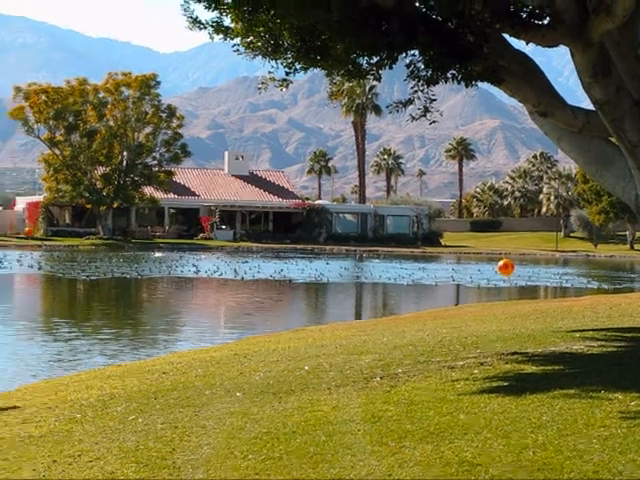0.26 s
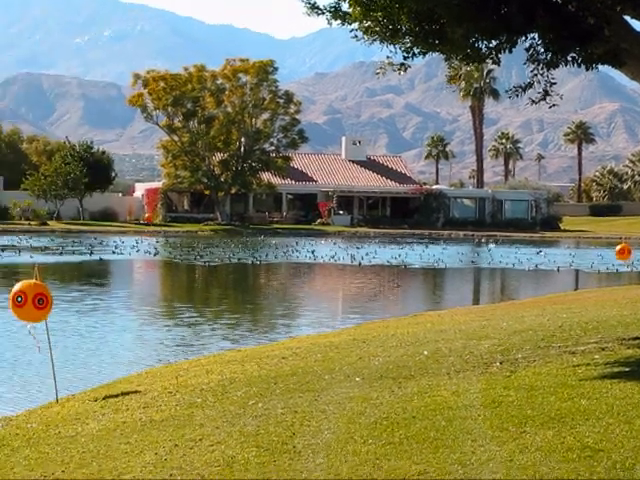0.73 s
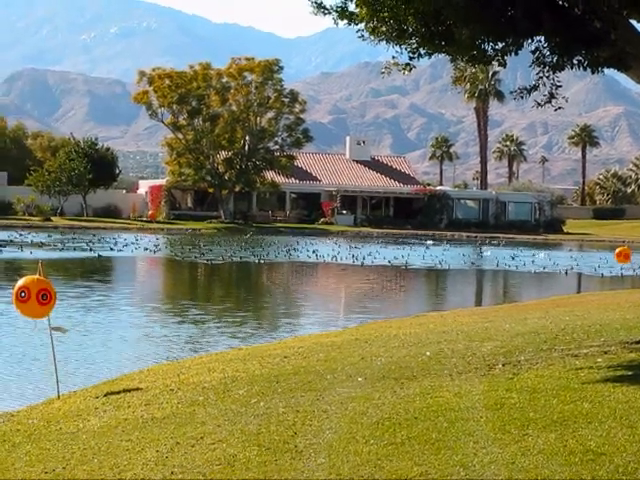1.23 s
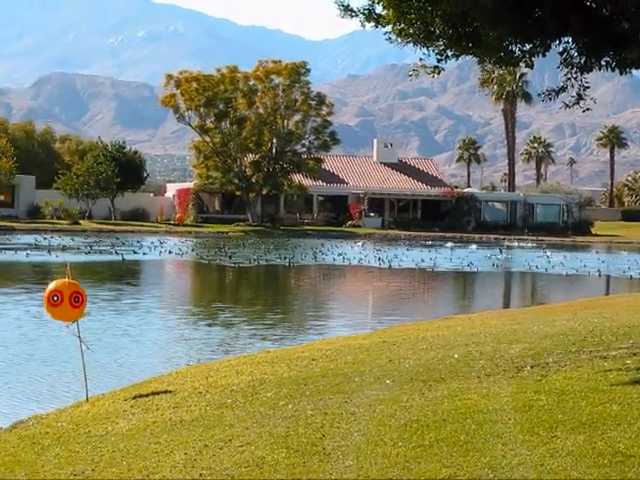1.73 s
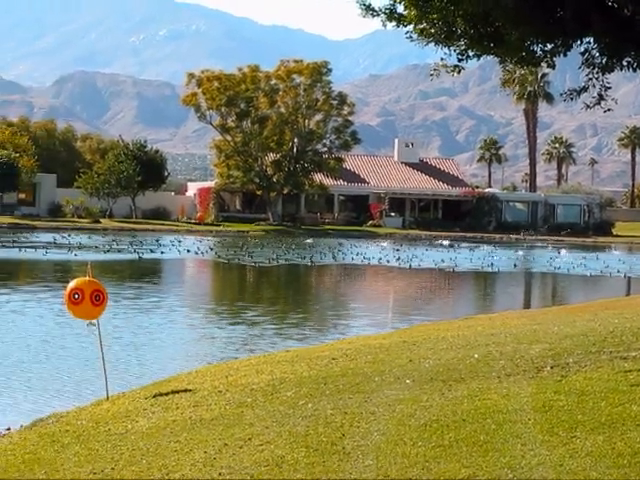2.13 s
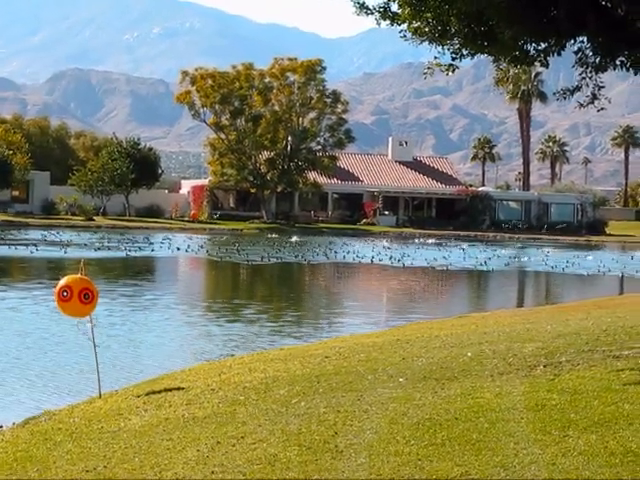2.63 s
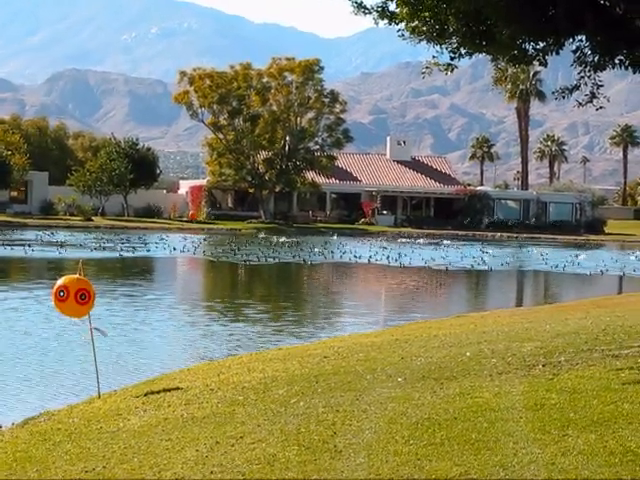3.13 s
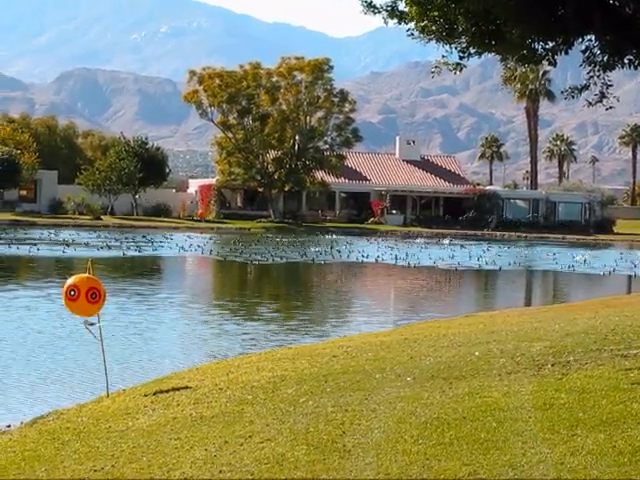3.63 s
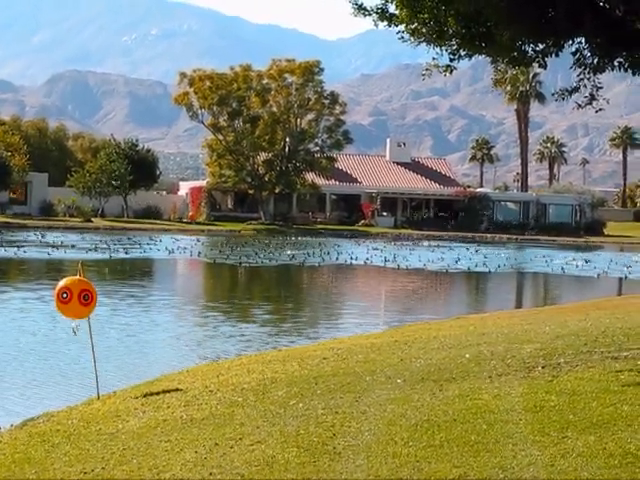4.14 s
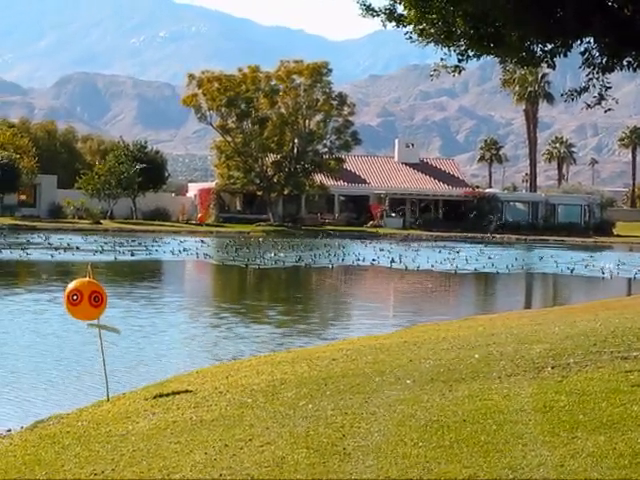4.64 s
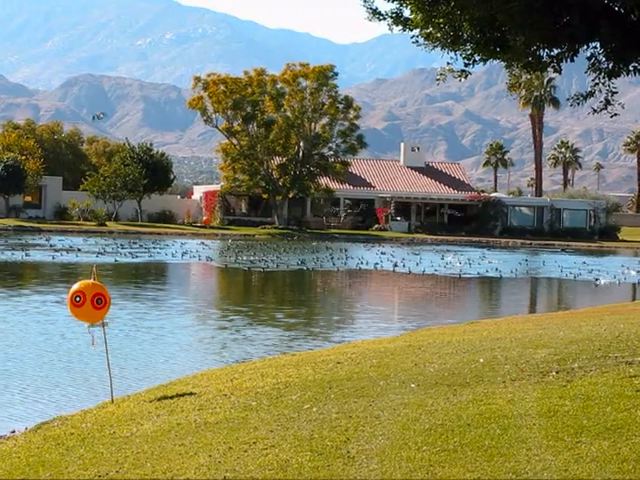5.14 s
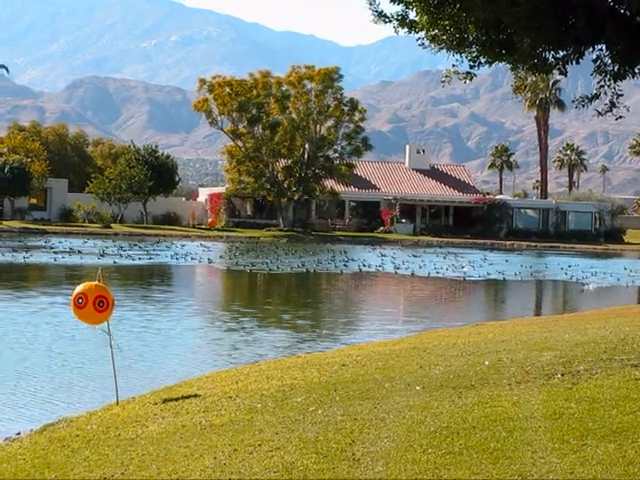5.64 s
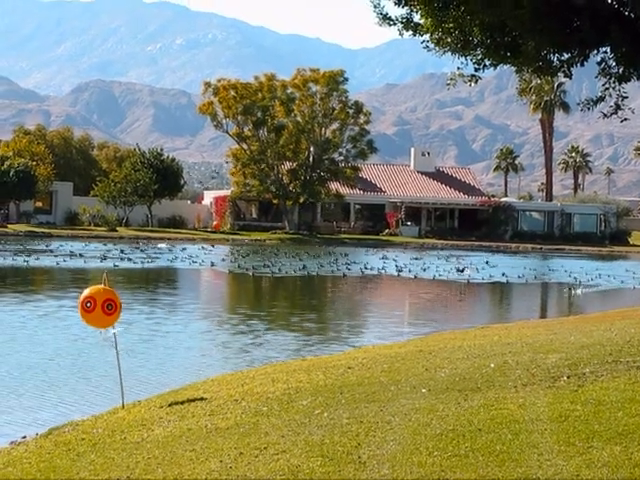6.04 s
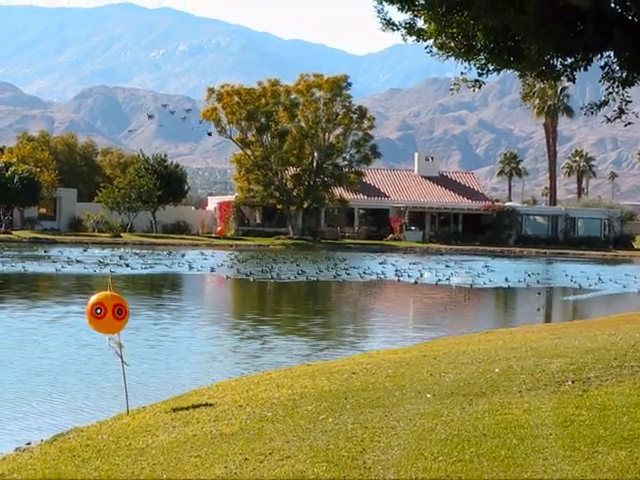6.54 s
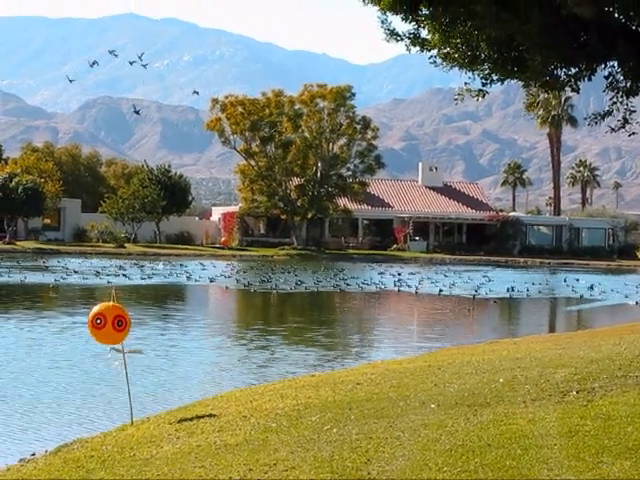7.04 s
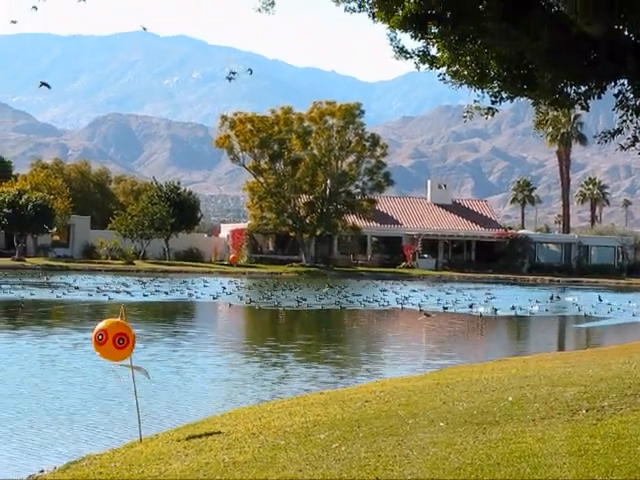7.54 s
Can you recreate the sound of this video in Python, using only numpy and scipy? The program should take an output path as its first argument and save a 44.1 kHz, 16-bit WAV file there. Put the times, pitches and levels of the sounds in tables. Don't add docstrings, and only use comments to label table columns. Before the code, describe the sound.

Far bird chatter and small splashes swell into crowded short whistles and dry clucks, while gusts bump the microphone and wings whistle past.

```python
import sys
import numpy as np
from scipy import signal
from scipy.fft import rfft, irfft
from scipy.io import wavfile
from scipy.ndimage import uniform_filter1d, map_coordinates

SR = 44100
rng = np.random.default_rng(int(sys.argv[2]) if len(sys.argv) > 2 else 0)


def ratio_of_db(decibels):
    return 10 ** (np.asarray(decibels, float) / 20)


def to_wav(sig):
    pcm = np.clip(np.atleast_2d(sig), -1, 1) * 32767
    pcm = np.round(pcm).astype(np.int16)
    wavfile.write(sys.argv[1], SR, pcm.T)


N = 343098

# [t/s, traffic level/dB, flock murmur level/dB, air hiss level/dB]
BACKGROUND = [
    (0.0, -51.5, -59, -57),
    (2.99, -48.5, -46, -56.5),
    (4.81, -50, -45.5, -55.5),
    (6.26, -49.5, -52, -55.5),
    (7.78, -49.5, -51, -53.5),
]
# [f/Hz, density level/dB]
TRAFFIC_SPECTRUM = [(18, -50), (30, -17), (59, -17.5), (118, -1), (206, -6.5), (412, -9), (717, -5.5),
                    (1760, -10.5), (2120, -13.5), (4000, -23), (5200, -26), (8800, -120)]
# [f/Hz, density level/dB]
HISS_SPECTRUM = [(880, -53), (1500, -8), (1830, -12.5), (2180, -3.5), (2360, -7.5), (3710, -8.5),
                 (9250, -16), (15700, -23.5)]
# [f/Hz, density level/dB]
MURMUR_SPECTRUM = [(1300, -6), (1800, -4), (2100, -9), (2600, 1), (3200, -6.5), (3900, -13)]
# [f/Hz, level/dB]
ELECTRONIC_TONES = [
    (15735, -85),
    (8970, -80),
    (9270, -80),
]
# [t/s, level/dB]
MACHINE_CARRIED = [(0, -62), (.45, -58), (.7, -52), (1.2, -49), (2.1, -46), (2.85, -56), (3.3, -60),
                   (4.4, -51), (5.8, -58), (6.3, -49), (6.9, -58), (7.78, -53)]
# [middle t/s, half length/s, multiple of fundamental, level/dB]
OVERTONE_SWELLS = [
    (.2, .6, 1.5, -58),
    (1.15, 1.1, 2, -60),
    (1.6, .4, 1.5, -62),
    (2.85, .5, 1.5, -59),
    (6.05, .7, 1.5, -62),
    (7.78, 1, 1.5, -59),
    (7.78, .9, 2, -60),
]
# [t/s, f/Hz, level/dB]
SECOND_MOTOR = [
    (3.9, 258, -80),
    (4.11, 263.6, -62),
    (5.12, 274.6, -57),
    (5.22, 275, -85),
]
# [peak t/s, peak level/dB, decay rate/(dB/s)]
WIND_GUSTS = [(0.0, -61.5, 0), (2.01, -55, 80), (2.23, -48, 62), (2.66, -53.5, 46), (3.73, -41.5, 128),
              (4.05, -44, 38), (4.47, -46.5, 19), (5.24, -40, 158), (6.26, -47, 100), (6.48, -44, 20),
              (7.10, -50, 12), (7.37, -48.5, 30), (7.57, -47.5, 16)]
# [f/Hz, density level/dB]
THUMP_SPECTRUM = [(20, -26), (40, -28), (70, -3), (110, -5), (180, -8.5), (300, -18.5), (500, -34)]
# [t/s, peak level/dB, f/Hz]
CAPSULE_KNOCKS = [(2.64, -32, 84.5), (3.605, -30, 97), (3.72, -28.5, 107), (4.131, -32, 123),
                  (4.612, -31, 117), (5.09, -30, 169), (5.163, -31, 132), (5.228, -23, 103),
                  (5.272, -22.5, 141), (6.48, -26.5, 125), (6.545, -31, 180), (2.29, -30, 130),
                  (6.703, -30, 115), (7.527, -36, 122), (7.562, -34, 85), (7.045, -34, 110),
                  (7.375, -35, 115)]
# [t/s, length/s, centre f/Hz, width/octaves, level/dB]
WATER_SPLASHES = [(.312, .008, 12000, .8, -62), (0.396, 0.064, 4000, 1.3, -61), (.49, .008, 6000, 1, -62),
                  (0.614, 0.012, 6500, 0.88, -59), (.733, 0.037, 5440, 0.74, -60),
                  (0.87, .02, 5500, 1.2, -58.5), (2.10, .015, 13000, .5, -72), (2.70, .012, 13000, .6, -66),
                  (2.735, .012, 11000, .9, -63), (.398, .060, 2700, .8, -55),
                  (3.365, 0.0037, 10500, .9, -54), (4.231, .010, 5000, 1.2, -55),
                  (4.287, .006, 3200, 1.5, -52), (4.605, .015, 14000, .4, -68),
                  (5.48, 0.11, 5450, 0.7, -61.5), (5.66, .03, 14000, .4, -65),
                  (5.754, 0.0066, 5000, 1.8, -54), (5.804, 0.042, 5600, 0.61, -56),
                  (6.029, .003, 7400, 0.65, -50), (6.544, .015, 7300, 0.52, -60),
                  (7.34, 0.028, 9000, 1.2, -62), (7.582, .06, 10500, .8, -65)]
# [t/s, f/Hz, level/dB]
DOWNSTROKES = [(6.623, 4950, -61), (6.624, 4620, -58), (6.726, 4930, -52), (6.730, 4700, -61),
               (6.838, 5930, -59), (6.840, 4700, -60), (6.950, 4600, -57), (6.952, 5950, -62),
               (7.063, 4940, -56), (7.065, 4620, -60), (7.165, 4600, -60), (7.285, 4870, -59),
               (7.560, 4230, -60), (7.760, 4420, -57), (6.650, 4320, -58), (7.398, 5830, -52),
               (7.430, 5750, -60), (7.510, 4860, -55), (7.623, 4810, -51.5), (7.623, 4550, -59),
               (7.729, 4580, -59), (7.731, 4800, -58)]
# [t/s, peak level/dB, throat f/Hz]
DRY_CLUCKS = [(.030, -41, 2500), (.228, -37, 1800), (2.580, -38, 1900), (3.590, -37, 2500),
              (2.822, -38, 1400), (3.2235, -37, 1700), (3.484, -35, 2500), (3.552, -35, 2400),
              (3.645, -33, 2000), (3.688, -35, 2300), (3.75, -28, 1550), (3.767, -35, 1400),
              (3.815, -30, 1750), (3.881, -34, 1600), (3.946, -32, 1400), (4.016, -37, 2300),
              (4.287, -28, 2900)]
# [t/s at top, hold/s, top f/Hz, level/dB]
FAR_CHATTER = [(.045, .030, 2560, -51.5), (.085, .015, 2600, -54.5), (.180, 0.012, 2560, -49.5),
               (.300, .028, 2450, -54.5), (.592, .020, 2380, -54), (.590, .055, 2030, -62),
               (.748, .014, 2400, -50.5), (0.94, .065, 2420, -57), (.730, .030, 2100, -59),
               (0.94, .030, 2410, -62), (.865, .064, 2170, -55), (1.030, .050, 2100, -59),
               (1.240, 0.027, 2500, -55), (1.160, .060, 2560, -54), (1.185, 0.057, 2055, -51.5),
               (1.212, .018, 2690, -54), (1.332, .011, 2690, -56), (1.350, 0.032, 2630, -60),
               (1.5, .020, 2060, -55), (1.455, .012, 1990, -57), (.930, .030, 2150, -60),
               (1.612, .022, 2670, -51), (1.712, .020, 2590, -52), (1.740, 0.029, 2540, -48),
               (1.766, .012, 2100, -51), (1.802, .025, 2570, -56), (1.850, .010, 2590, -50),
               (1.876, 0.02, 2570, -47.5), (1.505, .012, 2030, -57), (.420, 0.028, 2200, -52.5)]
# [t/s, length/s, f/Hz, level/dB]
LOW_GRUNTS = [
    (1.368, 0.018, 997, -45),
    (2.237, 0.036, 847, -52),
    (2.323, .012, 715, -35.5),
    (2.572, .015, 660, -39.5),
    (3.206, 0.031, 597, -44),
    (3.369, 0.024, 934, -43),
    (3.770, 0.054, 1525, -53),
    (3.931, .037, 1442, -50),
]
# [start t/s, length/s, first f/Hz, last f/Hz, level/dB]
TORN_GLIDES = [(1.022, .030, 2100, 2600, -51.5), (1.052, .036, 2600, 2350, -50),
               (1.976, .026, 3080, 3520, -54), (2.098, 0.034, 2000, 2790, -51),
               (2.150, .048, 2880, 2100, -49), (3.545, .022, 2250, 2950, -50),
               (4.092, 0.035, 2330, 1980, -44.5), (4.341, .024, 1950, 2400, -44),
               (4.360, 0.041, 2370, 2100, -43), (4.466, .055, 3470, 2720, -52),
               (4.595, 0.049, 2600, 3300, -51), (4.662, .024, 2870, 2600, -48),
               (4.681, .046, 3420, 2430, -48.5), (4.860, .022, 3450, 2880, -50),
               (5.112, .032, 2265, 2040, -43), (5.252, .046, 2500, 3620, -48.5),
               (5.308, .030, 3550, 2800, -49.5), (5.335, .042, 2820, 2430, -47),
               (5.520, .050, 2550, 3500, -53), (5.538, .036, 2100, 4120, -50),
               (5.600, .046, 3500, 2380, -52), (5.622, .020, 3500, 3050, -49),
               (5.645, .035, 3100, 2600, -54), (5.778, 0.035, 2480, 3350, -50),
               (5.882, .036, 3320, 3020, -50), (6.312, .030, 2980, 3720, -47),
               (6.334, .032, 2050, 2540, -45.5), (6.408, .030, 3420, 2770, -47),
               (6.436, .028, 2760, 2360, -50), (6.578, 0.034, 2450, 2820, -49),
               (6.668, .024, 4400, 3900, -56), (6.686, 0.019, 3480, 2980, -49),
               (7.222, .056, 2250, 3420, -51), (7.308, .026, 3380, 3080, -50),
               (.770, .035, 2050, 1880, -57), (2.040, .020, 3100, 2800, -53),
               (4.648, .032, 1830, 1960, -47), (5.125, .020, 1600, 1400, -49),
               (5.066, 0.019, 1450, 1850, -48.5), (1.515, .050, 2600, 2940, -53.5)]
# [start t/s, length/s, first f/Hz, level/dB]
FALLING_NOTES = [
    (3.868, .022, 2060, -41),
    (4.440, .024, 2790, -48),
    (4.838, 0.032, 2220, -41.5),
    (4.906, .020, 2900, -47),
    (5.150, 0.028, 2960, -51),
    (6.624, .010, 2820, -48),
    (.775, .025, 2080, -56),
    (1.905, .018, 2140, -51),
]
# [t/s at top, hold/s, top f/Hz, level/dB]
SHORT_PEEPS = [(2.018, 0.024, 2265, -48.5), (2.135, .012, 2050, -50), (2.205, .014, 2250, -52),
               (3.062, .065, 2310, -50), (3.075, 0.042, 2780, -47.5), (3.260, .040, 2260, -53),
               (3.318, .032, 2210, -47), (3.340, .012, 2870, -50), (3.355, .025, 3400, -54),
               (3.372, .026, 2800, -49), (3.640, 0.013, 2090, -47), (3.824, .040, 2293, -42),
               (3.905, 0.022, 3250, -53), (4.560, .020, 2800, -54), (4.570, 0.027, 1970, -52),
               (4.625, .030, 2340, -51), (4.722, .022, 2150, -40.5), (4.870, .008, 2136, -43),
               (4.890, .014, 3300, -53), (5.145, 0.0089, 3300, -52), (5.380, .020, 2144, -50),
               (6.376, 0.033, 2260, -43.5), (6.624, 0.0616, 2223, -35.5), (7.344, 0.015, 2620, -47),
               (7.570, .028, 3310, -55), (7.560, .028, 2160, -45.5)]
# [t/s at top, hold/s, top f/Hz, level/dB]
HOOKED_CALLS = [
    (4.068, 0.0141, 2620, -42),
    (4.812, .024, 2490, -40.5),
    (5.086, .016, 2620, -37.5),
    (7.533, .0127, 2360, -44.5),
]
# [t/s at top, hold/s, top f/Hz, level/dB, octave level/dB]
ARCHED_CALLS = [
    (2.388, .030, 1580, -41, -52),
    (4.388, .050, 1740, -49, -53),
    (4.670, 0.0039, 1950, -56, -56),
    (5.088, 0.019, 2005, -38.5, -51),
    (5.300, .012, 2040, -46, -70),
    (5.576, .022, 2050, -47, -70),
    (5.576, .046, 2240, -46, -70),
    (5.827, .040, 2370, -45.5, -70),
    (7.286, 0.027, 2160, -43, -70),
]
# [f/Hz, gain level/dB]
THROAT_RESPONSE = [(1000, -24), (1500, -7), (1950, -1), (2300, 0), (3300, -1), (3700, -7), (4400, -16)]


def rms_one(x):
    return x / np.sqrt(np.mean(x ** 2) + 1e-20)


def in_time(rows):
    s, *columns = np.transpose(rows)
    return [np.interp(np.arange(N) / SR, s, c) for c in columns]


def drift(rate_hz):
    pole = np.exp(-80 * np.pi * rate_hz / SR)
    noise = rng.standard_normal(N // 40 + 2002)
    slow = signal.lfilter([1], [1, -2 * pole, pole * pole], noise)[2000:]
    return np.interp(np.arange(N) / 40, np.arange(len(slow)), rms_one(slow))


def coloured(spectrum, patchy_db, rate_hz):
    hz = np.arange(N // 2 + 1) * SR / N + 1
    points = np.array(spectrum)
    shape = ratio_of_db(np.interp(np.log(hz), np.log(points[:, 0]), points[:, 1], left=-90, right=-90))
    shaped = shape * rfft(rng.standard_normal(N))
    octave = np.log2(hz / points[0, 0])
    out = np.zeros(N)
    for k in range(int(octave[shape > 1e-4].max()) + 2):
        part = irfft(shaped * np.clip(1 - abs(octave - k), 0, 1), N)
        out += part * ratio_of_db(patchy_db * drift(rate_hz))
    return rms_one(out)


def add(track, start_s, sound):
    at = round(start_s * SR)
    track[at:at + len(sound)] += sound[:N - at]


def whistle(length_s, start_hz, middle_hz, end_hz, edge_s):
    u = np.linspace(0, 1, max(round(length_s * SR), 2))
    hz = 2 * start_hz * (u - .5) * (u - 1)
    hz = hz - 4 * middle_hz * u * (u - 1)
    hz = hz + 2 * end_hz * u * (u - .5)
    ends = np.clip(np.minimum(u, 1 - u) * length_s / edge_s, 0, 1)
    return np.sqrt(2) * np.sin(np.pi / 2 * ends) ** 2 * np.sin(2 * np.pi * np.cumsum(hz) / SR)


def rings(rows, cycles, click_share):
    out = np.zeros(N)
    for s, peak_db, hz in rows:
        turns = np.arange(round(cycles * SR / hz)) * hz / SR
        dying = np.exp(-np.log(1000) * turns / cycles)
        dying = dying + click_share * np.exp(-3.0 * turns)
        add(out, s, -ratio_of_db(peak_db) * dying * np.sin(2 * np.pi * turns))
    return out


def electronic_tones():
    t, waver = np.arange(N) / SR, 1.5 * drift(5)
    return sum(ratio_of_db(db) * np.sin(2 * np.pi * hz * t + waver) for hz, db in ELECTRONIC_TONES)


def channel_slips(hiss, count=35, width_hz=1350, length_s=0.04):
    out, window = np.zeros(N), np.hanning(round(length_s * SR))
    for low_hz, (when, where) in zip(np.geomspace(4200, 14200, count), rng.random((count, 2))):
        band = signal.butter(4, [low_hz, low_hz + width_hz], "band", fs=SR, output="sos")
        piece = hiss[int(where * (N - len(window))):][:len(window)]
        add(out, when * N / SR, window * signal.sosfilt(band, piece))
    return out


def hum():
    machine_hz = 122.8
    t = np.arange(N) / SR
    partials = [(1, in_time(MACHINE_CARRIED)[0])]
    for s, half_s, k, db in OVERTONE_SWELLS:
        partials.append((k, db - 14 * ((t - s) / half_s) ** 2))
    waver_db, waver = drift(2.5), .3 * drift(1.5)
    out = np.zeros(N)
    for k, level_db in partials:
        out += ratio_of_db(level_db + waver_db) * np.sin(k * (2 * np.pi * machine_hz * t + waver))
    motor_hz, motor_db = in_time(SECOND_MOTOR)
    motor = ratio_of_db(motor_db) * np.sin(2 * np.pi * np.cumsum(motor_hz) / SR)
    return np.sqrt(2) * (out + motor)


def gusts():
    rise_db_per_s, end_s, breeze_db = 110, .7, -66
    t = np.arange(N) / SR
    gain = np.full(N, ratio_of_db(breeze_db))
    for s, peak_db, dying_db in WIND_GUSTS:
        outside_s = np.maximum(s - t, 0) + np.maximum(t - s - end_s, 0)
        level_db = peak_db - rise_db_per_s * outside_s - dying_db * np.maximum(t - s, 0)
        gain = np.maximum(gain, ratio_of_db(level_db))
    return gain


def wind():
    low_cut = signal.butter(2, 55, "high", fs=SR, output="sos")
    knocks = signal.sosfilt(low_cut, rings(CAPSULE_KNOCKS, cycles=5.8, click_share=0.47))
    return ratio_of_db(3.0) * gusts() * coloured(THUMP_SPECTRUM, patchy_db=3.5, rate_hz=44) + knocks


def splashes():
    out = np.zeros(N)
    droplets = rms_one(rng.standard_normal(N) * ratio_of_db(2.0 * rng.standard_normal(N)))
    for s, length_s, hz, octaves, level_db in WATER_SPLASHES:
        u = np.arange(round(2 * length_s * SR)) / SR / length_s
        edges = np.clip(hz * 2 ** (np.array([-.5, .5]) * octaves), 50, .45 * SR)
        band = signal.butter(2, edges, "band", fs=SR, output="sos")
        puff = droplets[round(s * SR):][:len(u)] * np.minimum(u / 0.019, 1) * np.exp(-1.6 * u)
        add(out, s, ratio_of_db(level_db + 2.0) * rms_one(signal.sosfilt(band, puff)))
    return out


def far_banks(x, t60_s=.2, tail_db=-18):
    t = np.arange(round(t60_s * SR)) / SR
    scatter = rng.standard_normal(len(t)) * ratio_of_db(-60 * t / t60_s) * (t > .003)
    scatter = signal.lfilter([.4], [1, -.6], scatter)
    return x + ratio_of_db(tail_db) * signal.fftconvolve(x, scatter / np.linalg.norm(scatter))[:N]


def strands(sound, flutter_db, rate_hz):
    arrival = np.arange(N) + .6 * flutter_db * drift(rate_hz)
    return map_coordinates(sound, [arrival], order=3) * ratio_of_db(flutter_db * drift(rate_hz))


def farthest_birds(count=1500):
    out = np.zeros(N)
    for when, long, pitch, arch, slope, loud in rng.random((count, 6)):
        top_hz = 1950 + 1500 * pitch ** 1.6
        tilt = 1 + 0.17 * (slope - .5) * np.array([-1, 1])
        ends_hz = top_hz * (1 - 0.106 * arch) * tilt
        note = whistle(.014 + .016 * long, ends_hz[0], top_hz, ends_hz[1], edge_s=.01)
        add(out, when * N / SR, ratio_of_db(3 * loud) * note)
    return rms_one(out)


def wings():
    out = np.zeros(N)
    for s, hz, level_db in DOWNSTROKES:
        add(out, s, ratio_of_db(level_db) * whistle(0.03, hz, hz, hz, edge_s=0.013))
    return out * ratio_of_db(1.5 + 4 * drift(260))


def grunts():
    out = np.zeros(N)
    for s, length_s, hz, level_db in LOW_GRUNTS:
        end_hz = hz * (1 - 0.039)
        add(out, s, ratio_of_db(level_db) * whistle(length_s, end_hz, hz, end_hz, edge_s=.01))
    return out


def glides():
    out = np.zeros(N)
    for s, length_s, first_hz, last_hz, level_db in TORN_GLIDES:
        middle_hz = 0.98 * (first_hz + last_hz) / 2
        add(out, s, ratio_of_db(level_db) * whistle(length_s, first_hz, middle_hz, last_hz, edge_s=0.0082))
    return out


def call(held_s, top_hz, level_db, octave_db, leg_s, depth, sag_per_s, leg_loss_db, haste):
    rise_depth, rise_s = .50, .025
    fall_depth, fall_s = .42, .028
    round_s = .006
    break_db, break_s = 3.5, .009
    t = np.arange(-leg_s / haste, held_s + leg_s, 1 / SR)
    rise = depth * rise_depth * (1 - np.exp(np.minimum(t, 0) * haste / rise_s))
    fall = depth * fall_depth * (1 - np.exp(-np.maximum(t - held_s, 0) / fall_s))
    hz = top_hz * (1 - rise) * (1 - fall) * (1 - sag_per_s * np.clip(t, 0, held_s))
    hz = uniform_filter1d(hz, round(round_s * SR), mode="nearest")
    phase = 2 * np.pi * np.cumsum(hz) / SR
    edge = np.clip(np.minimum(t - t[0], t[-1] - t) / .012, 0, 1)
    ends = np.sin(np.pi / 2 * edge) ** 2
    knots = np.arange(t[0], t[0] + 24 * break_s, break_s)
    octave_db = octave_db + break_db * np.interp(t, knots, rng.standard_normal(30)[:len(knots)])
    voice_db = level_db - leg_loss_db * (rise + fall)
    throat_hz, throat_db = np.transpose(THROAT_RESPONSE)
    out = np.zeros(len(t))
    for k, db in [(1, voice_db), (2, octave_db)]:
        resonance_db = np.interp(np.log(k * hz), np.log(throat_hz), throat_db)
        out += ratio_of_db(db + resonance_db) * np.sin(k * phase)
    return np.sqrt(2) * ends * out


def calls(rows, leg_s, depth, sag_per_s, leg_loss_db=12, haste=1, octave_loss_db=-21):
    out = np.zeros(N)
    for s, held_s, top_hz, level_db, *octave_db in rows:
        octave_db = octave_db[0] if octave_db else level_db + octave_loss_db
        sound = call(held_s, top_hz, level_db, octave_db, leg_s, depth, sag_per_s, leg_loss_db, haste)
        add(out, s - leg_s / haste, sound)
    return out


def flock():
    far = far_banks(calls(FAR_CHATTER, leg_s=.016, depth=.3, sag_per_s=.5), t60_s=.25, tail_db=-8)
    arches = calls(ARCHED_CALLS, leg_s=.042, depth=1.0, sag_per_s=1.5, leg_loss_db=46, haste=1.3)
    arches += glides()
    near = calls(HOOKED_CALLS, leg_s=0.0302, depth=.6, sag_per_s=0.88, leg_loss_db=35, haste=1.3)
    near += calls(SHORT_PEEPS, leg_s=.012, depth=0.453, sag_per_s=0.59)
    near += calls(FALLING_NOTES, leg_s=.011, depth=0.29, sag_per_s=4.1)
    near += grunts()
    out = strands(far, flutter_db=3, rate_hz=70)
    out += strands(arches, flutter_db=2.5, rate_hz=90)
    return out + strands(near, flutter_db=2, rate_hz=110)


def scene():
    traffic_db, murmur_db, hiss_db = in_time(BACKGROUND)
    traffic = ratio_of_db(traffic_db + 3) * coloured(TRAFFIC_SPECTRUM, patchy_db=1.0, rate_hz=9.2)
    hiss = ratio_of_db(hiss_db + 4.5) * coloured(HISS_SPECTRUM, patchy_db=0.63, rate_hz=12)
    murmur_gain = ratio_of_db(murmur_db - 7.0)
    murmur = murmur_gain * coloured(MURMUR_SPECTRUM, patchy_db=1.0, rate_hz=6.2)
    clucks = rings(DRY_CLUCKS, cycles=14.0, click_share=1.2)
    birds = murmur_gain * farthest_birds() + wings() + clucks + flock()
    mono = traffic + hiss + murmur + hum() + wind() + splashes() + far_banks(birds)
    side = ratio_of_db(-3.5) * channel_slips(hiss)
    return np.array([mono + side, mono - side])


def top_cut(x):
    return signal.sosfilt(signal.butter(12, 15880, fs=SR, output="sos"), x)


def record(dry):
    mix = dry + electronic_tones()
    return top_cut(mix)


dry = scene()
out = record(dry)
to_wav(out)
```